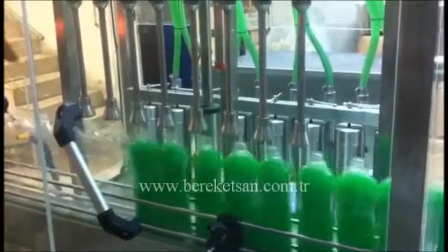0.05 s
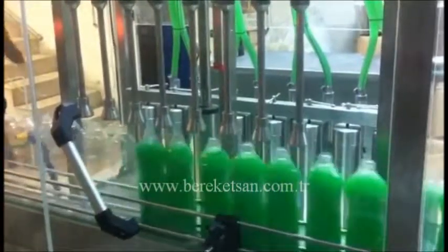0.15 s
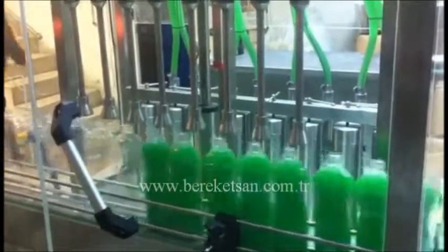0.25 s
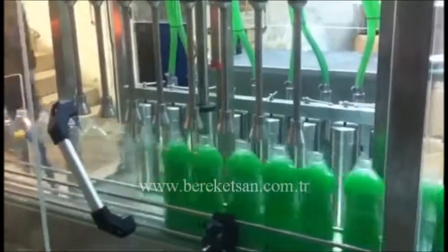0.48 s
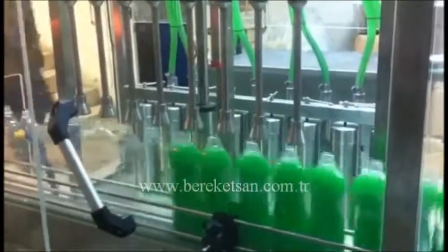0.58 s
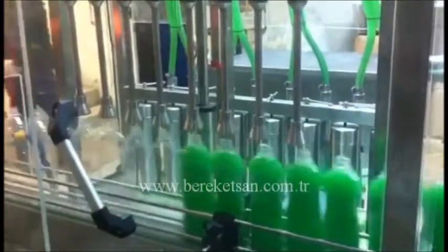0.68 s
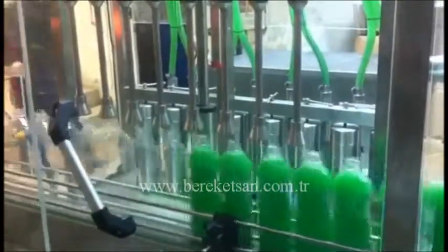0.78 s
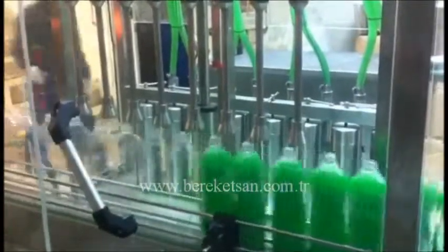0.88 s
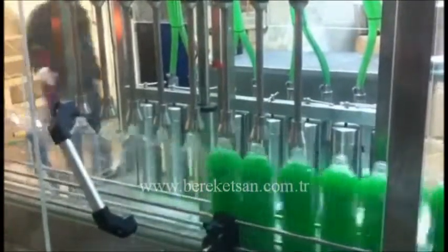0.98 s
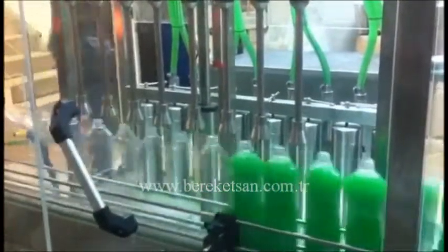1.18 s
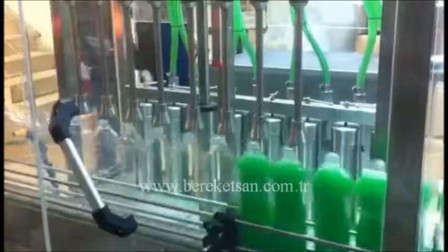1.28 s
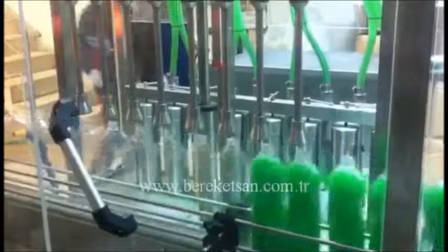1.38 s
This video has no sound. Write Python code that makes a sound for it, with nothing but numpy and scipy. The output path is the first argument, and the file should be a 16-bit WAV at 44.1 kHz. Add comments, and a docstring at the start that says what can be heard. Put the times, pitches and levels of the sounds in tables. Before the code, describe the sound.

A bottle filling line clacks and thuds close by, each hit short and dry. A light click opens, a dull thud follows at 0.2 seconds, then sharp clacks at 0.4 and 0.6, a clack with a thud at 1.1 and a lighter click at 1.2. A low drive hum and soft conveyor rush run throughout, with very faint high bottle squeaks around 0.7, 0.8 and 1.4 seconds.

```python
"""Bottle filling line, close up.

The line indexes its bottles: a few dry clacks and duller thuds at uneven moments, close to the microphone.
Each is one sudden push or pull that a heavily damped body swings out in two or three cycles.
Under them the drive hums, the conveyor rushes softly in the hall and bottles squeak on the guide rails."""
import sys
import numpy as np
from scipy import signal
from scipy.fft import rfft, irfft, next_fast_len
from scipy.io import wavfile
from scipy.ndimage import uniform_filter1d, map_coordinates

SR = 44100
rng = np.random.default_rng(int(sys.argv[2]) if len(sys.argv) > 2 else 0)


def pcm_store(signal):
    """Save signal as 16-bit PCM."""
    levels = np.round(np.clip(np.atleast_2d(signal), -1, 1) * 32767)
    wavfile.write(sys.argv[1], SR, levels.astype(np.int16).T)


N = 63945


def amp(db):
    """Decibels to gain."""
    return 10 ** (np.asarray(db) / 20)


def unit(x):
    """Scale to rms 1."""
    return x / np.sqrt(np.mean(x ** 2) + 1e-20)


def level(points):
    """A gain per sample from (s, dB) points."""
    return amp(np.interp(np.arange(N) / SR, *np.transpose(points)))


def wobble(rate):
    """A smooth random curve, rate knots a second."""
    knots = rng.standard_normal(int(N * rate / SR) + 4)
    return map_coordinates(knots, [np.arange(N) * rate / SR])


def filtered(x, response):
    """Filter x by a response given as a function of frequency in Hz."""
    size = next_fast_len(N + SR // 2)
    return irfft(rfft(x, size) * response(np.fft.rfftfreq(size, 1 / SR)), size)[:N]


def noise(spectrum, patchy_db):
    """Coloured noise of rms 1 with patches of random gain in frequency and time."""
    white = signal.stft(rng.standard_normal(N), nperseg=512)[2]
    patches = uniform_filter1d(rng.standard_normal(white.shape), size=7, axis=0)
    patches = uniform_filter1d(patches, size=14, axis=1)
    patchy = signal.istft(white * amp(patchy_db * unit(patches)), nperseg=512)[1][:N]
    points_hz, db = np.transpose(spectrum)
    return unit(filtered(patchy, lambda hz: amp(np.interp(np.log(hz + 1), np.log(points_hz + 1), db))))


def drive():
    """The drive runs under everything: a low rumble with two unsteady hum tones."""
    # The hum tones. Each row: pitch in Hz, rms level in dB.
    tones = [(155, -72), (222, -71.5)]
    # Colour of the rumble. Each row: frequency in Hz, relative density in dB.
    rumble_spectrum = [(15, -53.5), (25, -12.5), (43, -7.5), (151, 3.5), (239, 0), (325, -1), (379, -7),
                       (454, -3.5), (530, -16), (626, -8.5), (700, -16.5), (910, -51), (1540, -120)]
    # Swell of the rumble. Each row: time in seconds, level in dB.
    rumble_levels = [(0, -62), (.3, -58), (.55, -55.5), (.68, -56), (.82, -58.5), (1.02, -52), (1.17, -58),
                     (1.45, -59.5)]
    t = np.arange(N) / SR
    hum = 0
    for hz, db in tones:
        peak = np.sqrt(2) * amp(db + 3.5 * wobble(11))
        hum += peak * np.sin(2 * np.pi * hz * t + 1.2 * wobble(7.8))
    return hum + level(rumble_levels) * noise(rumble_spectrum, patchy_db=-1.66)


def conveyor():
    """Out in the hall the belt slides under the bottles: a soft rush with a thin hiss on top."""
    # Colours of rush and hiss. Each row: frequency in Hz, relative density in dB.
    rush_spectrum = [(350, -40), (600, -3), (700, -7.5), (807, 1.5), (964, -3.5), (1100, -1.5), (1220, -4),
                     (1590, 2), (2460, -7), (4400, -16.5), (5250, -21), (9280, -24), (10200, -27.5),
                     (13300, -70.5), (22000, -120)]
    hiss_spectrum = [(2000, -30), (4000, -13), (5000, 3.5), (7000, 2), (9500, -2), (11000, -20)]
    # Their rise and fall. Each row: time in seconds, level in dB.
    rush_levels = [(0, -62), (.3, -61.5), (.5, -62.5), (.6, -62.5), (.7, -60), (.8, -61), (1.1, -61.5),
                   (1.45, -62)]
    hiss_levels = [(0, -78.5), (.09, -84), (.13, -74.5), (.2, -78), (.5, -78), (.58, -75), (.66, -86),
                   (.85, -76), (.95, -84), (1.16, -83.5), (1.45, -84.5)]
    rush = level(rush_levels) * noise(rush_spectrum, patchy_db=1.8)
    hiss = level(hiss_levels) * noise(hiss_spectrum, patchy_db=4.0)
    return rush + hiss


def knocks(contacts, body_q):
    """Each jump of force is rounded by its contact, swings the body and loses its bass in the mounting."""
    mount_ratio, mount_q = 0.58, 1.31  # the mounting swings lower than the body
    size = next_fast_len(N + SR // 2)
    jf = 1j * np.fft.rfftfreq(size, 1 / SR)
    spectrum = 0
    for start, db, hardness_hz, body_hz, direction in contacts:
        jump = np.sign(direction) * amp(db) * np.exp(-2 * np.pi * jf * start)
        contact = 1 / (1 + jf / hardness_hz) ** 2
        jf_body, jf_mount = jf / body_hz, jf / (body_hz * mount_ratio)
        body = SR / (2 * np.pi * body_hz) * jf_body / (1 + jf_body / body_q + jf_body ** 2)
        mount = jf_mount ** 2 / (1 + jf_mount / mount_q + jf_mount ** 2)
        spectrum += jump * contact * body * mount
    return irfft(spectrum, size)[:N]


def clacks():
    """Hard contacts near the microphone, on a body so damped that it hardly swings."""
    # Each row: start in seconds, force jump in dB, hardness in Hz, body pitch in Hz, push +1 or pull -1.
    hard_contacts = [(.0054, -17.5, 11900, 283, 1), (.3876, .5, 7240, 266, -1), (.6109, -4, 1250, 275, -1),
                     (.61118, -10, 7260, 256, -1), (1.0201, -26.5, 20000, 270, 1),
                     (1.0879, -4, 15200, 235, -1), (1.2165, -19, 10600, 250, -1)]
    return knocks(hard_contacts, body_q=0.59)


def thuds():
    """Soft contacts round off the treble, and the body swings a little longer."""
    # Each row: start in seconds, force jump in dB, hardness in Hz, body pitch in Hz, push +1 or pull -1.
    soft_contacts = [(.2139, -11.5, 259, 308, -1), (.2225, -17.5, 460, 233, 1), (.2245, -30, 200, 95, -1),
                     (.9315, -25, 343, 135, -1), (.9445, -34, 150, 108, 1), (1.0605, -30, 255, 205, -1),
                     (1.0819, -3.5, 156, 245, -1), (1.0895, -26.5, 200, 106, 1)]
    return knocks(soft_contacts, body_q=1.56)


def squeaks():
    """Bottles rub along the guide rails: short, faint, unsteady tones that swell and fade."""
    # Each row: middle in seconds, length in seconds, pitch in Hz, rms level at the middle in dB.
    rubs = [(0.677, 0.044, 5050, -78), (.785, 0.087, 5000, -78.5), (1.38, .07, 4560, -78)]
    waver_rad = 0.78
    t = np.arange(N) / SR
    sound = 0
    for middle, length, hz, db in rubs:
        swell = np.sqrt(2) * amp(db) * np.exp(-(2 * (t - middle) / length) ** 2)
        sound += swell * np.sin(2 * np.pi * hz * t + waver_rad * wobble(150))
    return sound


def scene():
    """Close clacks and thuds over the running machine, in mono."""
    return (drive() + conveyor() + clacks() + thuds() + squeaks())[None]


def record(dry):
    """One microphone, into a recorder that keeps nothing above its band limit."""
    top_hz = 10200
    return filtered(dry[0], lambda hz: 1 / np.sqrt(1 + (hz / top_hz) ** 120))[None]


dry = scene()
out = record(dry)
pcm_store(out)
```